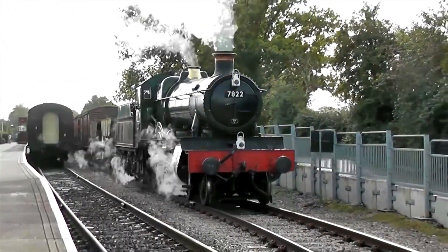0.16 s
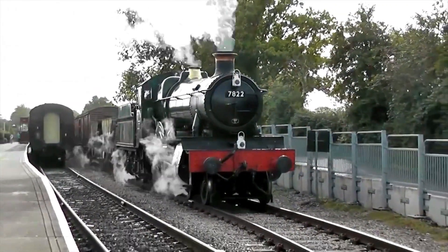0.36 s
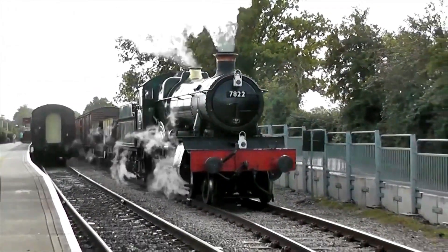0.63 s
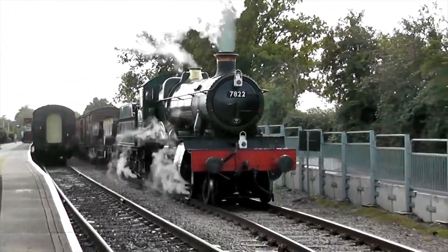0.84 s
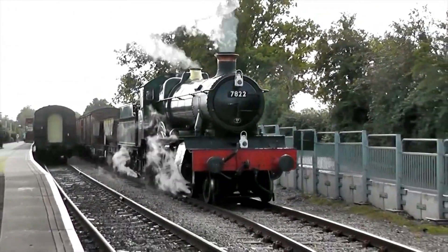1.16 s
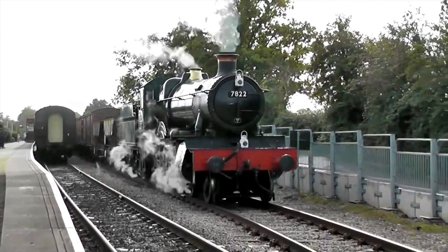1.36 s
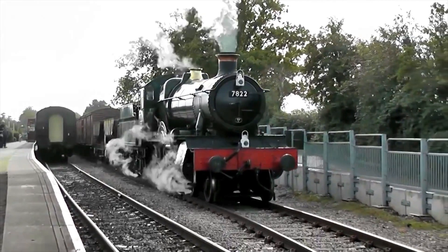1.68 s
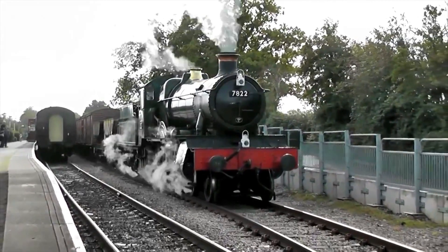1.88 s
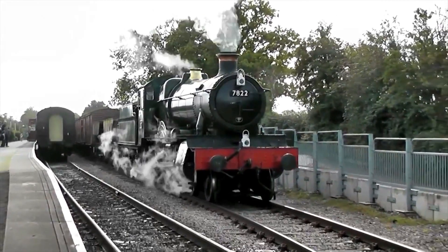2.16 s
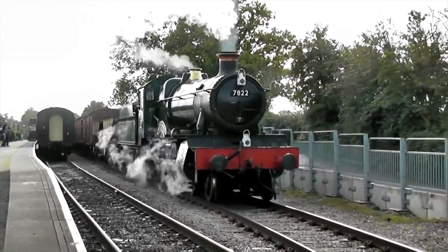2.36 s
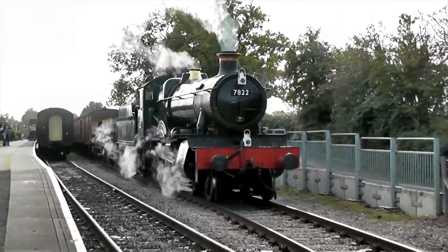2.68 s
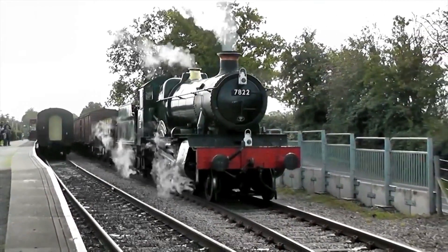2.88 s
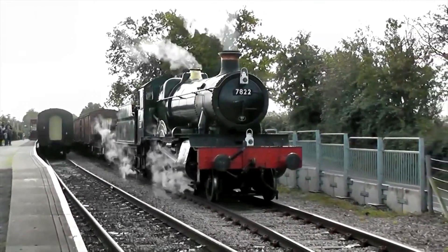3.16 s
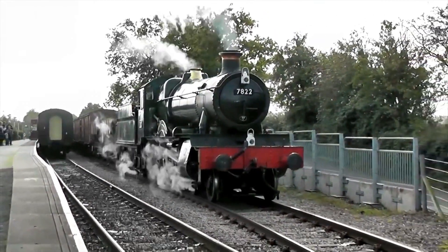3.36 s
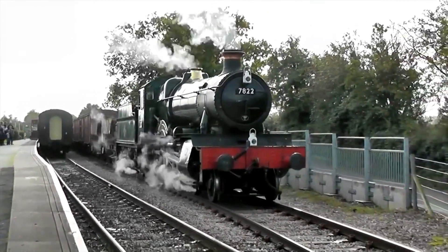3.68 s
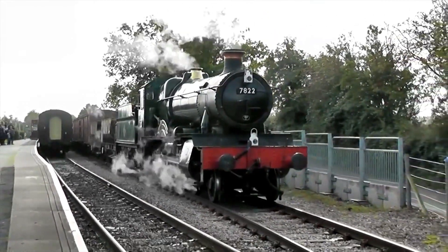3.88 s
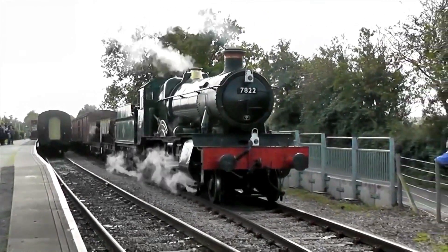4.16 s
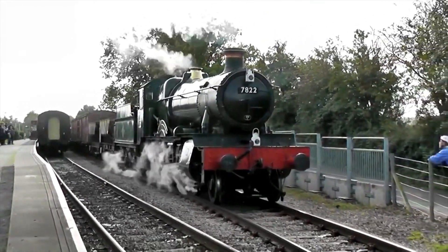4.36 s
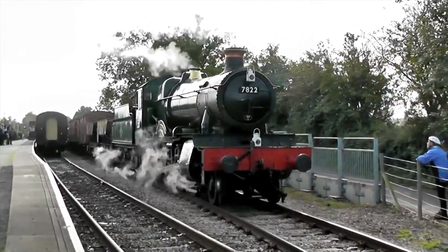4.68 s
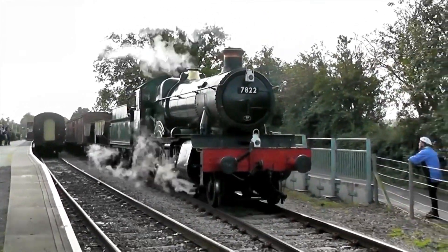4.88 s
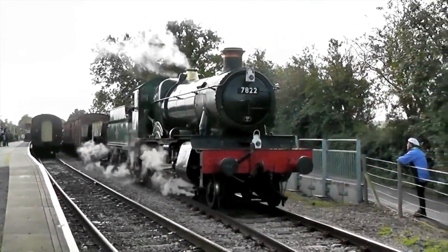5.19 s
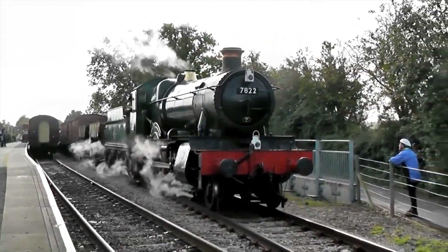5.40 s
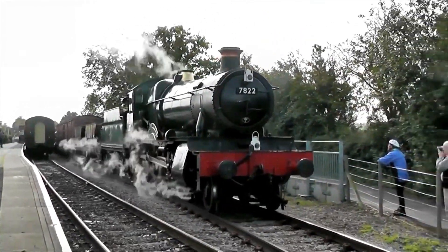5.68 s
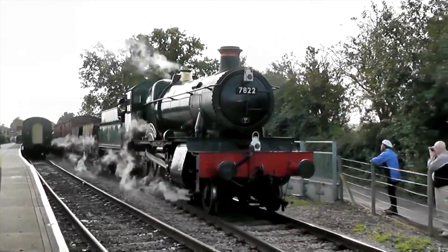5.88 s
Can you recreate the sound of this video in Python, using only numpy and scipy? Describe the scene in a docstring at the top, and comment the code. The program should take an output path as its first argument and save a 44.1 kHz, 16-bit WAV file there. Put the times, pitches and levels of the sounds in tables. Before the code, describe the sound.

From the start, a steam locomotive sends a loud, steady jet of steam up its chimney, a hissing roar with a hollow, pipe-like ring. A few very brief high whistling chirps poke through in the first two seconds. At about 2.3 seconds the jet shuts off abruptly. A thinner, sputtering hiss from the cylinders remains and builds, with fizzy spurts and wet gushes around 3.7 and 4.5 seconds. Soft exhaust chuffs, each a rush ending in a low thump, come roughly every 0.8 seconds, quickening slightly and standing clearer from 3 seconds. A low rolling rumble swells around 3 seconds. From 4 seconds the fire drums and flutters with short hollow gulps, growing as the engine nears. A dull piston knock with a sharp spit lands at 5.3 seconds, followed by the strongest chuff. Hiss and rumble continue outdoors to the end at 6 seconds.

```python
"""A steam jet roars up a locomotive's chimney, ringing it like a pipe, until its valve is shut.
The open cylinder cocks hiss, spit and briefly whistle; pistons knock at the ends of their strokes.
Soft exhaust beats quicken, each a rush in the chimney and a thump in the smokebox. The fire's low,
gulping rumble grows as the engine draws its goods train slowly towards a platform."""
import sys
import numpy as np
from scipy import signal
from scipy.fft import rfft, irfft, next_fast_len
from scipy.io import wavfile
from scipy.ndimage import uniform_filter1d, map_coordinates

SR = 44100
rng = np.random.default_rng(int(sys.argv[2]) if len(sys.argv) > 2 else 0)


def unload_audio(sound):
    """Save the sound as a 16-bit wav file, at the path given as the first command line argument."""
    columns = np.transpose(np.atleast_2d(sound))
    # keep every value between -1 and 1, then stretch to whole-number steps
    steps = np.round(np.clip(columns, -1, 1) * 32767)
    wavfile.write(sys.argv[1], SR, steps.astype(np.int16))


N = 265922


def amp(db):
    """Decibels to gain."""
    return 10 ** (np.asarray(db) / 20)


def unit(x):
    """Scale to rms 1."""
    return x / np.sqrt(np.mean(x ** 2) + 1e-20)


def clock():
    """Sample times in seconds."""
    return np.arange(N) / SR


def curve(rows):
    """Interpolate (seconds, value) rows to one value per sample."""
    return np.interp(clock(), *np.transpose(rows))


def wobble(rate_hz):
    """Smooth random curve, rate_hz knots a second."""
    knots = rng.standard_normal(int(N * rate_hz / SR) + 4)
    return map_coordinates(knots, [clock() * rate_hz])


def filtered(x, response):
    """Apply a gain given as a function of Hz."""
    size = next_fast_len(N + 8192)
    return irfft(rfft(x, size) * response(np.fft.rfftfreq(size, 1 / SR)), size)[:N]


def noise(spectrum, lift_db=lambda hz: 0):
    """Noise of rms 1, shaped by (Hz, dB) rows plus a lift, rolled off at both ends."""
    knots_hz, knots_db = np.transpose(spectrum)

    def gain(hz):
        db = np.interp(np.log(hz + 1), np.log(knots_hz), knots_db) + lift_db(hz)
        rolloff = 1 + (knots_hz[0] / 2 / (hz + 1)) ** 2 + (hz / knots_hz[-1] / 2) ** 2
        return amp(db) / rolloff
    return unit(filtered(rng.standard_normal(N), gain))


def resonances(hz, modes):
    """Lift in dB from a table of resonances."""
    return sum(db / (1 + (2 * (hz - centre) / width) ** 2) for centre, width, db in modes)


def patchy(x, depth_db):
    """Turbulence: neighbouring bands swell and fade independently."""
    bands = signal.stft(x, nperseg=512)[2]
    field = uniform_filter1d(rng.standard_normal(bands.shape), size=6, axis=0)
    field = unit(uniform_filter1d(field, size=12, axis=1))
    return unit(signal.istft(bands * amp(depth_db * field), nperseg=512)[1][:N])


def swell(peak_s, rise_s, fall_s):
    """Rounded rise to 1, then a dying tail."""
    t = clock() - peak_s
    return np.exp(1 - np.hypot(1, t / np.where(t < 0, rise_s, fall_s)))


def held(start_s, end_s, attack_s, release_s):
    """Rise to 1 by the start, hold to the end, then decay."""
    t = clock()
    return np.exp(np.minimum(t - start_s, 0) / attack_s - np.maximum(t - end_s, 0) / release_s)


def blip(peak_s, hz, rise_s, fall_s, sag):
    """Heavily damped resonance whose pitch sags through hz."""
    pitch_hz = hz * (1 - sag * np.tanh((clock() - peak_s) / fall_s / 2))
    cycles = np.cumsum(pitch_hz) / SR + rng.random()
    return swell(peak_s, rise_s, fall_s) * np.sin(2 * np.pi * cycles)


SHUT_S, SHUT_DB_PER_S = 2.344, 230

def valve(late_s=0):
    """Jet gain: 1 while the valve is open, then a quick fall."""
    return amp(-SHUT_DB_PER_S * np.maximum(clock() - SHUT_S - late_s, 0))


# Jet roar. Each row: frequency in Hz, density in dB.
JET_SPECTRUM = [(100, -21), (180, -6), (330, -8), (560, -9.5), (690, -12.5), (740, 2.5), (1130, -9.5),
                (2400, -12.5), (3400, -7.5), (4300, 1.5), (5100, -1), (5900, -10), (8200, -7.5),
                (8700, -16), (11000, -18.5), (15500, -49)]
# Chimney pipe resonances. Each row: centre in Hz, width in Hz, lift in dB.
CHIMNEY_MODES = [(910, 99, 4.5), (998, 57, 8.5), (1273, 114, 11.5), (1460, 390, 11.5), (1674, 115, 11.5),
                 (1806, 73, 7.5), (2067, 81, 12.5), (2180, 132, 15.5), (2583, 163, 16), (2730, 72, 6),
                 (2975, 76, 12.5), (3200, 340, 8.5), (3698, 39, 6), (3770, 160, 8.5), (4180, 200, 1.5),
                 (4380, 62, 8), (5390, 66, 0.5), (6640, 800, 8)]
# Lowest chimney resonance. Each row: frequency in Hz, density in dB.
HOLLOW_SPECTRUM = [(720, -35), (830, -9.5), (900, -1), (975, -9.5), (1070, -26)]
JET_DB, HOLLOW_DB, HOLLOW_GROWTH_DB, HOLLOW_GROWTH_S = -24, -38.5, 10, 0.6

def jet():
    """Steam blows the chimney like a wide pipe; its lowest tone builds to the shut-off and lingers."""
    roar = patchy(noise(JET_SPECTRUM, lambda hz: resonances(hz, CHIMNEY_MODES)), depth_db=1.47)
    roar_db = JET_DB + 0.15 * wobble(12.5) + 0.82 * wobble(70)
    hollow_db = HOLLOW_DB + HOLLOW_GROWTH_DB * np.exp(np.minimum(clock() - SHUT_S, 0) / HOLLOW_GROWTH_S)
    hollow = noise(HOLLOW_SPECTRUM) * amp(hollow_db)
    return roar * amp(roar_db) * valve() + hollow * valve(late_s=0.021)


# Steam flow from the cocks. Each row: time in seconds, hiss level in dB.
COCK_FLOW = [(0, -34.5), (2.34, -34), (2.42, -37), (2.56, -29.5), (3.2, -27.5), (3.45, -28), (3.68, -26.5),
             (4.3, -25.5), (4.55, -27), (5.25, -26.5), (5.46, -29), (5.6, -25), (6.03, -24.5)]
# Hiss and the fizz above it. Each row: frequency in Hz, density in dB.
HISS_SPECTRUM = [(500, -17), (900, -11.5), (1400, -6.5), (1700, -9), (2400, -11), (3000, -8), (4200, -4),
                 (5200, -1.5), (5900, -6.5), (7000, -4), (8200, -7), (8800, -11), (11000, -11),
                 (15700, -29)]
FIZZ_SPECTRUM = [(5500, -7.5), (8000, -2.5), (9800, -2), (11000, -4.5), (13000, -8), (15700, -12.5)]
# Drain pipe resonances. Each row: centre in Hz, width in Hz, lift in dB.
DRAIN_MODES = [(3660, 65, 6), (4490, 360, 2), (5470, 150, -1.5), (5460, 320, 5), (6400, 330, 4.5),
               (8450, 400, 1)]
# Spurts at peak cylinder pressure. Each row: peak in seconds, fizz lift in dB, rise and fall in seconds.
PRESSURE_SPURTS = [(.38, 7, .04), (1.22, 7, 0.049), (1.55, 10, .035), (2.3, 7, .025), (2.595, 1, 0.036),
                   (3.142, 5, .06), (3.945, 4.5, 0.036), (4.693, 7, 0.033), (5.42, 6, 0.02)]
SLACK_DB, SLACK_LEAD_S, SLACK_S = -2, 0.099, 0.0087  # the valve crosses over before each spurt
FIZZ_DB, FIZZ_AT_HISS_DB, FIZZ_DB_PER_HISS_DB = -33, -25.5, 1.53

def cylinder_cocks():
    """Wet steam sputters from under the cylinders, brighter in strong flow and in each spurt."""
    slack = sum(swell(s - SLACK_LEAD_S, SLACK_S, SLACK_S) for s, _, _ in PRESSURE_SPURTS)
    hiss_db = curve(COCK_FLOW) + SLACK_DB * slack
    spurt_db = sum(db * swell(s, width, width) for s, db, width in PRESSURE_SPURTS)
    facing_db = 4 * swell(peak_s=4.2, rise_s=0.36, fall_s=0.36)  # fizz beamed at the listener
    fizz_db = FIZZ_DB + FIZZ_DB_PER_HISS_DB * (hiss_db - FIZZ_AT_HISS_DB) + spurt_db + facing_db
    steam = noise(HISS_SPECTRUM, lambda hz: resonances(hz, DRAIN_MODES) + ground_bounce(hz))
    hiss = patchy(steam, depth_db=1.28) * amp(hiss_db)
    fizz = patchy(noise(FIZZ_SPECTRUM), depth_db=1.1) * amp(fizz_db + 1.15 * wobble(8.7))
    sputter_db = 0.4 * wobble(25) + 0.64 * wobble(140)
    return (hiss + fizz) * amp(sputter_db)


def ground_bounce(hz, spacing_hz=443.0, depth_db=4.0, fade_hz=2450):
    """Comb in dB from the ground reflection; rough ballast blurs it in the treble."""
    return depth_db * np.cos(2 * np.pi * hz / spacing_hz) * np.exp(-hz / fade_hz)


# Fire rumble and draught. Each row: frequency in Hz, density in dB.
RUMBLE_SPECTRUM = [(25, -40), (50, -40), (75, -6), (120, 4), (190, -3), (290, -0.5), (390, -13), (800, -37)]
DRAUGHT_SPECTRUM = [(250, -18), (400, -2.5), (560, 4.5), (660, 0), (790, -8.5), (900, -2.5), (1100, -17.5),
                    (1400, -10), (2500, -15.5)]
# Drumming in the fire. Each row: start in seconds, end in seconds, rumble in dB, draught in dB.
DRUM_SPELLS = [(4.03, 4.52, -30, -40.5), (4.85, 5.12, -24.5, -32.5), (5.459, 5.735, -29, -35.5),
               (5.874, 6.03, -25.5, -35)]
RUMBLE_DB, DRAUGHT_DB, JET_DRAUGHT_DB, NEARING_DB_PER_S = -51, -56.5, -43.5, 2.5

def fire():
    """The fire rumbles, drums and flutters, louder as it nears; the jet pulls extra air through it."""
    nearing_db = NEARING_DB_PER_S * clock()
    flutter = wobble(30)
    spells = np.array([held(start, end, attack_s=0.02, release_s=0.12) for start, end, *_ in DRUM_SPELLS])
    drum_rumble, drum_draught = amp(np.transpose(DRUM_SPELLS)[2:]) @ spells
    rumble_gain = np.hypot(amp(RUMBLE_DB + nearing_db), drum_rumble)
    draught_gain = np.hypot(amp(DRAUGHT_DB + nearing_db), drum_draught + amp(JET_DRAUGHT_DB) * valve())
    rumble = rumble_gain * noise(RUMBLE_SPECTRUM) * amp(0.62 * flutter)
    draught = draught_gain * noise(DRAUGHT_SPECTRUM) * amp(1.9 * flutter)
    return rumble + draught


# Rolling loudness. Each row: time in seconds, level in dB.
ROLL_LEVELS = [(0, -56), (1.9, -61), (2.5, -46), (3.0, -37.5), (3.6, -45.5), (4.3, -43.5), (6.03, -38)]
# Rolling noise. Each row: frequency in Hz, density in dB.
ROLL_SPECTRUM = [(25, -27), (45, -24), (65, -6.5), (110, -12), (160, -15), (300, -17.5)]

def rolling():
    """The train's weight rumbles on the rails."""
    return noise(ROLL_SPECTRUM) * amp(curve(ROLL_LEVELS))


# Steam whistles, and in the last two rows a metallic clink. Each row: peak in seconds, pitch in Hz, level in
# dB, rise and fall in seconds.
SHORT_TONES = [(0.2, 1700, -29.5, 0.1), (.4, 4700, -28.5, 0.033), (0.8, 4200, -24, 0.027),
               (1.202, 3940, -26, .018), (1.3, 2560, -25.5, 0.018), (1.393, 4440, -24, 0.01),
               (1.99, 4410, -23.5, 0.016), (5.527, 5080, -24.5, .012), (5.536, 1405, -31, 0.023)]

def whistles():
    """Steam catches on an edge and sings briefly at an unsteady pitch; at 5.53 s a metal part clinks in two
    short tones."""
    tones = np.zeros(N)
    for peak_s, hz, db, width_s in SHORT_TONES:
        pitch_hz = hz + 60 * wobble(400)
        tones += amp(db) * swell(peak_s, width_s, width_s) * np.sin(2 * np.pi * np.cumsum(pitch_hz) / SR)
    return tones


# Stroke ends. Each row: peak in seconds, knock in dB, spit in dB, spit rise in seconds.
STROKE_ENDS = [(.372, -30.5, -29, .003), (2.18, -23.5, -26, .003), (3.741, -23, -20, 0.0074),
               (4.69, -30, -22, 0.0052), (5.28, -12, -16.5, .001)]
# Spit from a cock. Each row: frequency in Hz, density in dB.
SPIT_SPECTRUM = [(300, -15), (1200, -2.5), (2300, -8), (3200, -1.5), (4800, 6.5), (6800, 1.5), (9000, -2.5),
                 (15500, -22)]

def pistons():
    """A piston ends its stroke with a dull knock, and its cock spits."""
    knocks = sum(amp(db) * blip(s, hz=144.3, rise_s=0.003, fall_s=0.0047, sag=0.081)
                 for s, db, _, _ in STROKE_ENDS)
    spit_gain = sum(amp(db) * swell(s, rise_s, fall_s=0.011) for s, _, db, rise_s in STROKE_ENDS)
    return knocks + spit_gain * patchy(noise(SPIT_SPECTRUM), depth_db=1.5)


# Exhaust beats. Each row: peak in seconds, base thump level in dB, rush in dB, time scale in seconds.
EXHAUST_BEATS = [(0.669, -29.5, -33, 0.037), (1.547, -33, -46, 0.045), (2.333, -28.5, -37.5, 0.024),
                 (3.144, -25, -28, 0.043), (3.983, -23.5, -26.5, 0.024), (4.735, -23, -31.5, 0.038),
                 (5.423, -15.5, -28, 0.036), (6.02, -30, -51, 0.046)]
# Chimney rush and smokebox thump. Each row: frequency in Hz, density in dB.
RUSH_SPECTRUM = [(150, -17), (300, 5.5), (520, 6.5), (720, -2), (900, 2.5), (1300, -19.5), (1800, -12.5),
                 (2300, -35), (6000, -22), (12000, -50)]
THUMP_SPECTRUM = [(50, -12), (110, 6.5), (200, 10.5), (310, 1), (410, -6.5), (520, -0.5), (900, -54)]
RUSH_LEAD_S, THUMP_TRIM_DB, BOOM_TRIM_DB = 0.028, -2, 0.5

def exhaust():
    """Each beat starts as a rush in the chimney and ends as a thump that makes the smokebox boom."""
    rush_gain, thump_gain, boom = np.zeros((3, N))
    for peak_s, thump_db, rush_db, scale_s in EXHAUST_BEATS:
        rush_gain += amp(rush_db) * swell(peak_s - RUSH_LEAD_S, 0.58 * scale_s, 0.99 * scale_s)
        thump_gain += amp(thump_db + THUMP_TRIM_DB) * swell(peak_s, 0.68 * scale_s, 0.7 * scale_s)
        ring = blip(peak_s, hz=190, rise_s=0.5 * scale_s, fall_s=0.5 * scale_s, sag=0.03)
        boom += amp(thump_db + BOOM_TRIM_DB) * ring
    rush = rush_gain * noise(RUSH_SPECTRUM, lambda hz: resonances(hz, CHIMNEY_MODES))
    return rush + thump_gain * noise(THUMP_SPECTRUM) + boom


# Wet steam gushes. Each row: peak in seconds, level in dB, rise and fall in seconds.
STEAM_GUSHES = [(3.668, -26, 0.062), (3.778, -32, .016), (4.508, -25.5, .03), (4.61, -24.5, 0.051)]
# Gush noise. Each row: frequency in Hz, density in dB.
GUSH_SPECTRUM = [(1500, -40), (2500, -16), (3600, -6.5), (4500, -6.5), (6000, -7), (12000, -16.5)]

def gushes():
    """Wet steam gushes out ahead of the piston near the end of a stroke."""
    gain = sum(amp(db) * swell(s, width, width) for s, db, width in STEAM_GUSHES)
    return gain * noise(GUSH_SPECTRUM)


# Gulps in the rumble. Each row: peak in seconds, level in dB, pitch in Hz.
DRAUGHT_GULPS = [(4.189, -21, 270), (4.343, -18, 280), (4.428, -15, 270), (4.48, -19, 150),
                 (4.825, -15.5, 290), (4.854, -12.5, 240), (4.951, -12, 270), (5.104, -14.5, 270),
                 (5.265, -16.5, 280), (5.641, -16, 285), (5.863, -17, 260), (5.918, -17.5, 220),
                 (5.98, -18.5, 280)]

def gulps():
    """The fire's draught gulps in short, hollow, falling tones."""
    return sum(amp(db) * blip(s, hz, rise_s=0.0035, fall_s=0.0051, sag=0.15)
               for s, db, hz in DRAUGHT_GULPS)


# Echoes off platform edge, fence and boiler. Each row: initial delay in seconds, gain in dB.
ECHO_PATHS = [(.0091, -25.5), (.0143, -17.5), (0.023, -24), (.038, -22)]

def echoes(x, highpass_hz=530, drift_per_s=0.00506):
    """Narrow surfaces reflect only short waves; the paths shift as the engine rolls on."""
    bright = filtered(x, lambda hz: hz / np.hypot(hz, highpass_hz))
    t = clock()
    stretch = 1 + drift_per_s * t
    return sum(amp(db) * map_coordinates(bright, [(t - delay_s * stretch) * SR], order=3)
               for delay_s, db in ECHO_PATHS)


def scene():
    """All sources lie in one direction, so both channels are alike."""
    engine = jet() + cylinder_cocks() + fire() + rolling()
    engine += whistles() + pistons() + exhaust() + gushes() + gulps()
    heard = amp(-0.5) * (engine + echoes(engine))
    return np.array([heard, heard])


TOP_HZ = 15800

def record(dry):
    """Brick-wall low-pass on each channel."""
    return np.array([filtered(channel, lambda hz: hz < TOP_HZ) for channel in dry])


dry = scene()
out = record(dry)
unload_audio(out)
```